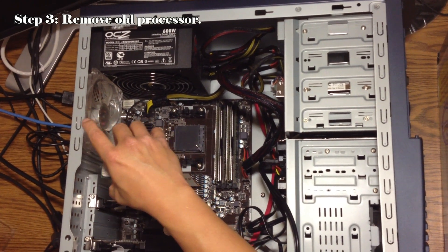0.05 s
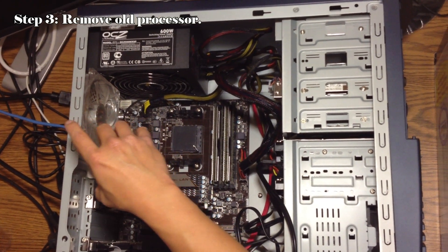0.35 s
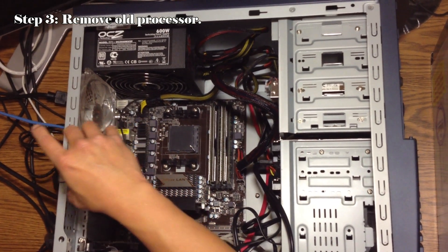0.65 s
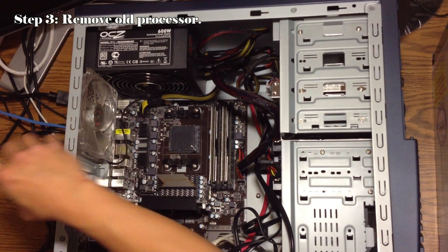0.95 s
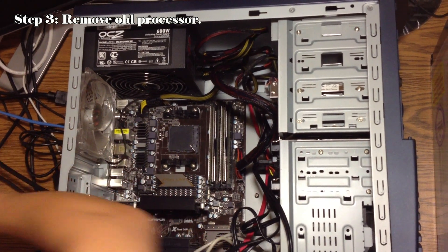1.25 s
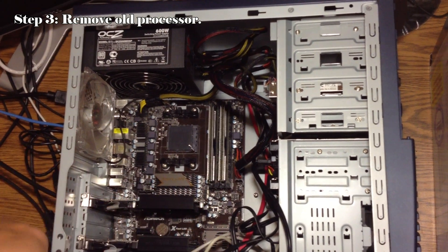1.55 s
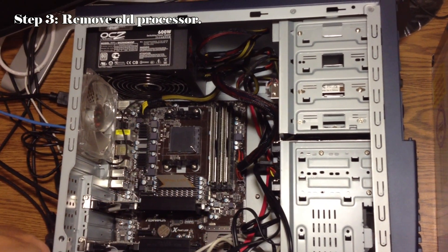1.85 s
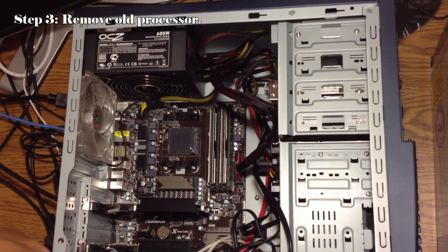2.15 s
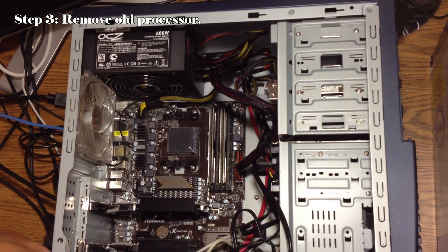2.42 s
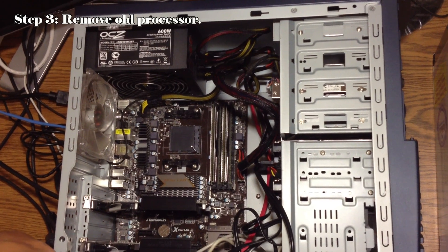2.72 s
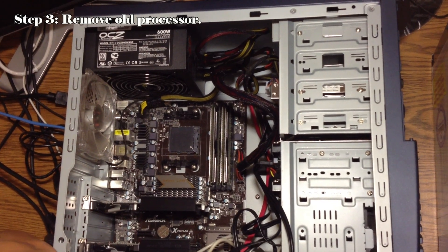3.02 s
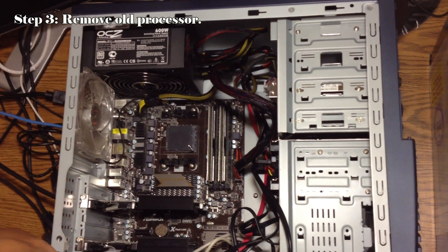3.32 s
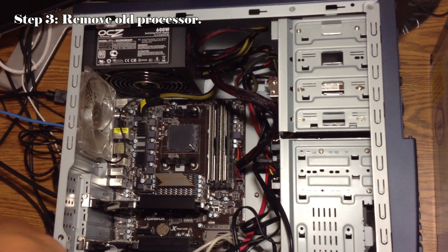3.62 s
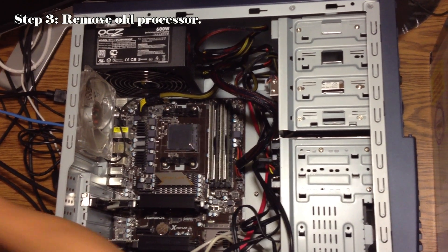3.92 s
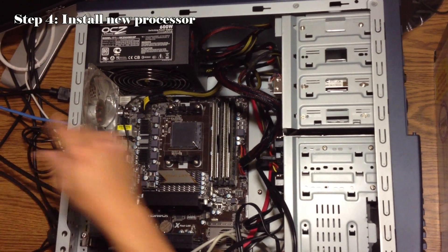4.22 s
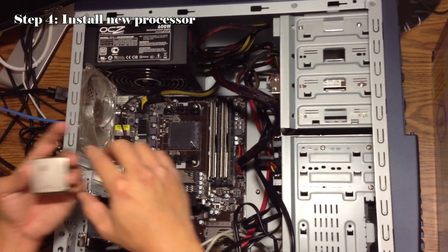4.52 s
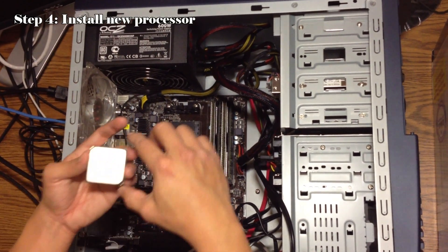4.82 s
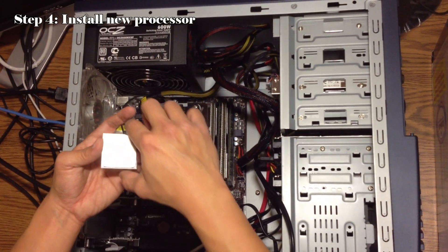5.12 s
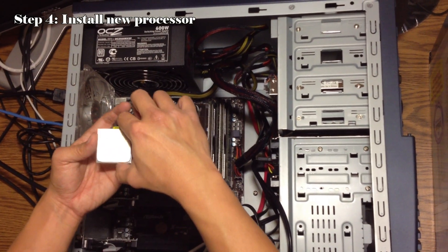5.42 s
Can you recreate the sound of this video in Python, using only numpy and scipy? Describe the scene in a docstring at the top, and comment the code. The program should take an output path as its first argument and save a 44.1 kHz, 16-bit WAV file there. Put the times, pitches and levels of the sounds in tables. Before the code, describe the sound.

Fingers tap and slide on a metal computer case, then a light part clatters down, over a faint hum.

```python
"""A small quiet room, hands at work on an open computer case. Fingers tap and slide on the sheet
metal and ring its rim, with one soft bump and a faint squeak. A light part is put down beside the
case and clatters to rest; skin brushes it as it is picked up. Each contact is a noise burst that
drives a panel crash, ringing modes and room echo. Mains hum and a soft hiss lie underneath."""
import sys
import numpy as np
from scipy import signal
from scipy.fft import rfft, irfft, next_fast_len
from scipy.io import wavfile
from scipy.ndimage import uniform_filter1d

SR = 44100
rng = np.random.default_rng(int(sys.argv[2]) if len(sys.argv) > 2 else 0)


def dump(signal):
    """Clip the signal to [-1, 1] and save it as 16-bit WAV at the path in sys.argv[1]."""
    limited = np.clip(np.atleast_2d(signal).T, -1, 1)
    pcm = np.round(limited * 32767).astype(np.int16)
    wavfile.write(sys.argv[1], SR, pcm)


N = 249606
TIME = np.arange(N) / SR


def from_db(db):
    """Decibels to gain."""
    return 10 ** (np.asarray(db) / 20)


def unit_energy(x):
    """Scale so the squares sum to one."""
    return x / np.sqrt(np.sum(x ** 2) + 1e-20)


def unit_rms(x):
    """Scale to an rms of one."""
    return unit_energy(x) * np.sqrt(len(x))


def coloured(x, points):
    """Minimum-phase filter through (Hz, dB) points."""
    size = 2 * next_fast_len(len(x))
    hz, db = np.transpose(points)
    grid_hz = np.maximum(np.fft.rfftfreq(size, 1 / SR), 1)
    gain = from_db(np.interp(np.log(grid_hz), np.log(hz), db))
    cepstrum = irfft(np.log(gain))
    cepstrum[1:size // 2] *= 2
    cepstrum[size // 2 + 1:] = 0
    return irfft(rfft(x, size) * np.exp(rfft(cepstrum)))[:len(x)]


def flattened(x, width_hz=51, floor=0.045):
    """Level broad spectral humps, keep the fine ripple; unit energy."""
    power = uniform_filter1d(np.abs(rfft(unit_energy(x), SR)) ** 2, width_hz)   # one bin per Hz
    hz = np.arange(10, SR // 2, 10)
    gain_db = -10 * np.log10(power[hz] + floor)
    return unit_energy(coloured(x, np.column_stack([hz, gain_db])))


def drift(rate_hz):
    """Random wander with a spread of about one."""
    knots = rng.standard_normal(int(N / SR * rate_hz) + 2)
    return np.interp(TIME * rate_hz, np.arange(len(knots)), knots)


def add(track, start_s, sound):
    """Mix a sound into the track."""
    at = int(start_s * SR)
    track[at:at + len(sound)] += sound[:N - at]


def hum(waver_db=1.4, waver_rad=0.36):
    """Mains and machinery tones, wavering in level and phase."""
    # Hum lines. Each row: frequency in Hz, rms level in dB.
    lines = [(60, -95), (180, -83.5), (240, -70.5), (262, -81), (300, -85), (360, -78.5), (388, -87.5)]
    tones = np.zeros(N)
    for hz, level_db in lines:
        gain = from_db(level_db + waver_db * drift(14.0))
        phase = 2 * np.pi * (hz * TIME + rng.random()) + waver_rad * drift(1.3)
        tones += gain * np.sin(phase)
    return np.sqrt(2) * tones


def room_air(level_db=-66.0):
    """Steady noise of room air and hiss."""
    # Air spectrum. Each row: frequency in Hz, relative density in dB.
    spectrum = [(25, -33), (45, -36), (90, -14.5), (130, -12), (170, -3.5), (290, -4.5), (340, -9),
                (900, -12), (1800, -16.5), (7500, -20), (9900, -25), (12000, -20.5), (14500, -19.5)]
    return from_db(level_db) * unit_rms(coloured(rng.standard_normal(N), spectrum))


def contacts(rows, spectrum, thump_db, snap_db, rise_share=0.2, snap_per_hardness=0.55):
    """Contact force: brief chatters of tiny clicks, coloured by where and how hard each lands."""
    force, t = np.zeros(N), TIME[:4096]
    for start_s, level_db, clang_db, hard_db, chatter_s in rows:
        pressure = (1 - np.exp(-t / (rise_share * chatter_s))) * from_db(-20 * t / chatter_s)
        burst = flattened(rng.standard_normal(len(t)) * pressure)
        tone = [(280, thump_db), (1000, clang_db), (1700, 0), (2900, 0), (3500, hard_db),
                (7500, hard_db), (11000, snap_db + snap_per_hardness * hard_db)]
        add(force, start_s, from_db(level_db) * coloured(burst, tone))
    return coloured(force, spectrum)


def dying_noise(low_t60_s, high_t60_s):
    """Dense overlapping resonances, the high ones dying sooner; unit energy."""
    t, tail = TIME[:SR], 0
    edges_hz = np.geomspace(90, 18000, 15)
    t60s_s = np.geomspace(low_t60_s, high_t60_s, len(edges_hz) - 1)
    for low_hz, high_hz, t60_s in zip(edges_hz, edges_hz[1:], t60s_s):
        bandpass = signal.butter(2, [low_hz, high_hz], "band", fs=SR, output="sos")
        band = signal.sosfilt(bandpass, rng.standard_normal(2 * SR))[SR:]
        tail += unit_energy(band * from_db(-60 * t / t60_s)) * np.sqrt(high_hz - low_hz)
    return unit_energy(tail)


def radiated(force, modes, ring_db, direct_db, room_db, panel_t60_s, room_t60_s, build_s):
    """Force to sound: direct click, short panel crash and ringing modes, with room echo."""
    t = TIME[:SR]
    panel = dying_noise(1.1 * panel_t60_s, panel_t60_s)
    room = dying_noise(1.8 * room_t60_s, room_t60_s) * (1 - np.exp(-t / build_s))
    echo = from_db(room_db) * unit_energy(room)
    crash = flattened(from_db(direct_db) * signal.unit_impulse(SR) + panel + echo)
    ringing = np.zeros(SR)
    for hz, level_db, t60_s in modes:
        fade = from_db(-60 * t / t60_s)
        ringing += from_db(level_db) * 2 * fade / fade.sum() * np.cos(2 * np.pi * hz * t)
    ringing = (ringing + signal.fftconvolve(ringing, echo)[:SR]) / np.sqrt(2)
    return signal.fftconvolve(force, crash + from_db(ring_db) * ringing)[:N]


def taps():
    """Force of fingers and the part touching the case."""
    # Touches. Each row: start in seconds, level, panel clang and hardness in dB, chatter in seconds.
    touches = [(.199, -13.5, -7.5, -1.5, 0.022), (.218, -8, -12.5, -7, 0.0056), (.427, -26, 1.5, -10, .016),
               (.485, -14.5, 10.5, -3.5, 0.025), (.5145, -8.5, 5.5, 11, 0.0026), (.549, -5.5, 2, 1, .005),
               (.5575, -11, 2, 4.5, 0.0034), (.562, -1, 5, -24, 0.0043), (.639, -22, 13, 2, 0.0028),
               (.672, -25, 14, 2.5, 0.038), (.697, -19.5, 1, -4.5, 0.0074), (.756, -29.5, -9, 1.5, 0.012),
               (1.766, -20.5, 2, -3.5, 0.015), (1.812, -22, 3, -4, 0.028), (1.842, -18.5, 5.5, -8, 0.0082),
               (2.232, -28.5, 5, 3.5, 0.0082), (2.264, -27, 6, 2.5, 0.014), (2.628, -24, 9.5, -1.5, 0.0074),
               (2.7565, -29, 0, -4, 0.0027), (2.776, -30, 9.5, -4, 0.0055)]
    # Tap force spectrum. Each row: frequency in Hz, gain in dB.
    spectrum = [(25, -50), (60, -34), (120, -29), (180, -11.5), (300, -4.5), (480, -11.5), (800, -5),
                (1100, -1.5), (2900, -2), (3500, -4.5), (5200, 1.5), (8300, -4), (9800, -13.5),
                (15000, -16.5)]
    return contacts(touches + ticks(), spectrum, thump_db=1, snap_db=2)


def case_rim(force):
    """The sheet-metal rim rings under the fingers."""
    # Rim modes. Each row: frequency in Hz, relative peak gain in dB, T60 in seconds.
    modes = [(178, 3, .25), (278, 6, .2), (603, 8, .25), (856, 10, .3), (1085, 9.5, .11), (1150, 10.5, .11),
             (1400, 5, .1), (1580, 5, .12), (1990, 7, .07), (2550, 7, .12), (2670, 9, .12), (2970, 6, .09),
             (4400, 3, .06), (5200, 1, .025)]
    return radiated(force, modes, ring_db=2.0, direct_db=-5.5, room_db=-4.5,
                    panel_t60_s=0.082, room_t60_s=0.19, build_s=0.0011)


def slides(grain_db=2.5):
    """Force of skin catching and slipping in uneven grains that swell and fade with each stroke."""
    # Strokes. Each row: start and end in seconds, level in dB, brightness in dB.
    strokes = [(0.333, 0.399, -62, 6), (.39, 0.506, -62, 9), (0.619, 0.737, -63, 5),
               (1.791, 1.851, -58.5, 3), (4.337, 4.513, -69, 11), (4.49, 4.519, -59.5, -20),
               (4.542, 4.61, -62.5, 18)]
    # Friction spectrum. Each row: frequency in Hz, gain in dB.
    spectrum = [(60, -28), (180, 18), (500, 4.5), (1100, -1.5), (2500, 2), (3600, -0.5), (5300, -1),
                (8500, -2.5), (10000, -8), (15000, -7)]
    force = np.zeros(N)
    for start_s, end_s, level_db, bright_db in strokes:
        length = int((end_s - start_s) * SR)
        grains = rng.standard_normal(length) * from_db(grain_db * drift(500)[:length])
        friction = coloured(coloured(grains, spectrum), [(1200, 0), (8000, bright_db)])
        swell = signal.windows.tukey(length, .6)
        add(force, start_s, from_db(level_db) * unit_rms(friction) * swell)
    return force


def thud(start_s=1.768, hz=172, level_db=-49.0, t60_s=0.32, rise_s=0.0046):
    """A soft bump sets one low panel mode swinging."""
    t = np.maximum(TIME - start_s, 0)
    envelope = from_db(level_db - 60 * t / t60_s) * (1 - np.exp(-t / rise_s))
    return envelope * np.sin(2 * np.pi * hz * t)


def squeak(centre_s=1.985, width_s=0.032, hz=1585, level_db=-70, waver=0.016):
    """One faint squeak of slightly unsteady pitch."""
    phase = 2 * np.pi * np.cumsum(hz * (1 + waver * drift(140))) / SR
    envelope = np.exp(-((TIME - centre_s) / width_s) ** 2)
    return from_db(level_db) * np.sqrt(2) * np.sin(phase) * envelope


def ticks(count=4, first_s=2.85, gap_s=.095, jitter_s=.005, level_db=-33.5, spread_db=1.5):
    """Contact rows for a loose run of faint finger ticks."""
    clang_db, hard_db, chatter_s = 7.5, -5.5, 0.0049
    return [(first_s + k * gap_s + jitter_s * late, level_db - spread_db * weak,
             clang_db, hard_db, chatter_s)
            for k, (late, weak) in enumerate(rng.standard_normal((count, 2)))]


def landing():
    """Force of the part landing: an edge knocks, the face slaps, its weight follows, it bounces."""
    # Impacts. Each row: start in seconds, level, clang and hardness in dB, chatter in seconds.
    impacts = [(3.2042, 6.3, -2.5, -8.5, 0.0071), (3.2255, 3.6, 2.5, 4.5, 0.0025),
               (3.2335, 2.5, 3, -7, .011)]
    # Impact force spectrum. Each row: frequency in Hz, gain in dB.
    spectrum = [(25, -44), (60, -30), (130, -24), (190, -1), (320, -1), (700, 4.5), (1400, 1), (2600, 0),
                (3700, -2), (5200, 0), (8600, -1), (9800, -8), (14000, -7), (15500, -20)]
    return contacts(impacts + bounces(), spectrum, thump_db=4.5, snap_db=1)


def part_clatter(force):
    """The part and the surface under it ring together."""
    # Part and surface modes. Each row: frequency in Hz, relative peak gain in dB, T60 in seconds.
    modes = [(168, 10, .3), (239, 11, .35), (315, 4, .3), (424, 7, .28), (517, 0, .3), (601, 2, .3),
             (670, 11, .22), (699, 7, .26), (849, 6, .25), (905, 11, .25), (1078, 8, .22), (1103, 9, .18),
             (1140, 5, .15), (1310, 4, .25), (1554, 4, .25), (2094, 3, .25), (2260, 1, .04), (2943, 6, .25),
             (5150, 4, .035)]
    return radiated(force, modes, ring_db=-1.0, direct_db=-12.0, room_db=-6.0,
                    panel_t60_s=0.054, room_t60_s=0.21, build_s=0.0076)


def bounces(count=7, start_s=3.291, first_flight_s=.05, restitution=.72, first_db=1.5, loss_db=4):
    """Contact rows for ever quicker, weaker bounces; the part rocks, near edge then far edge."""
    near_clang_db, far_clang_db, far_lag_s = -7, -1.5, .005
    hard_db, chatter_s = 1, 0.0054
    rows = []
    for k in range(count):
        level_db = first_db - k * loss_db
        rows.append((start_s, level_db, near_clang_db, hard_db, chatter_s))
        rows.append((start_s + far_lag_s, level_db, far_clang_db, hard_db, chatter_s))
        start_s += first_flight_s * restitution ** k
    return rows


def scene():
    """Fingers work on the rim, then the part clatters down, over hum and hiss; mono."""
    finger_force = taps() + slides()
    part_force = landing()
    rim = from_db(0.78) * case_rim(finger_force)
    clatter = from_db(0.42) * part_clatter(part_force)
    return (rim + clatter + thud() + squeak() + hum() + room_air())[None]


def record(dry, cutoff_hz=15500):
    """Steep elliptic low-pass."""
    return signal.sosfilt(signal.ellip(12, .1, 70, cutoff_hz, fs=SR, output="sos"), dry)


dry = scene()
out = record(dry)
dump(out)
```